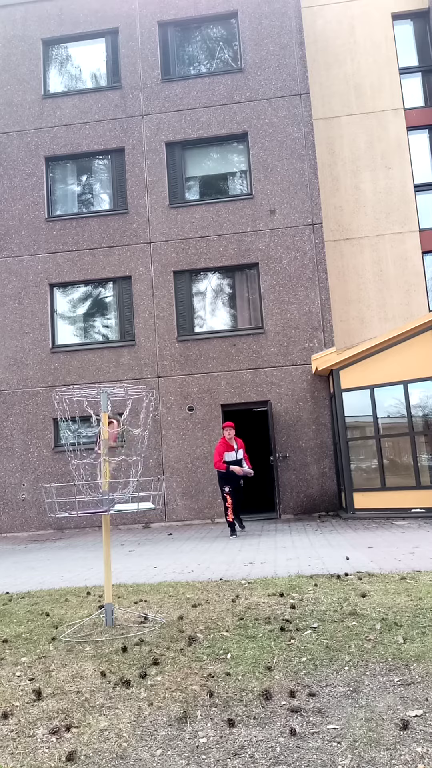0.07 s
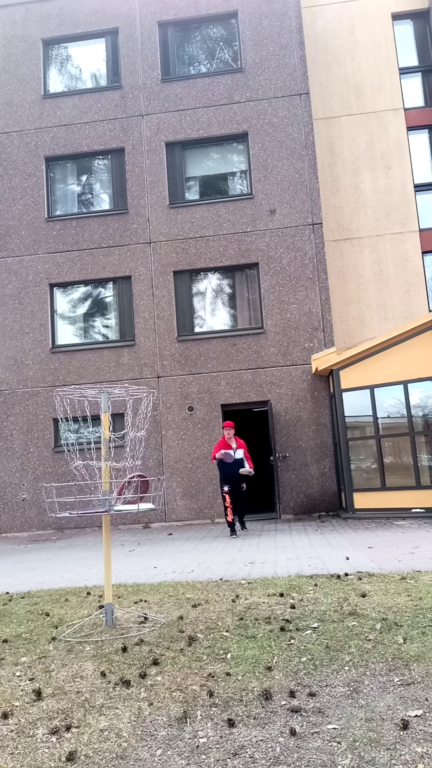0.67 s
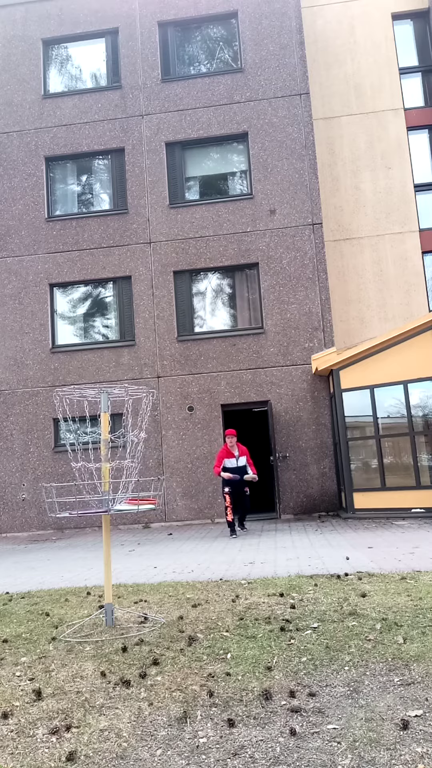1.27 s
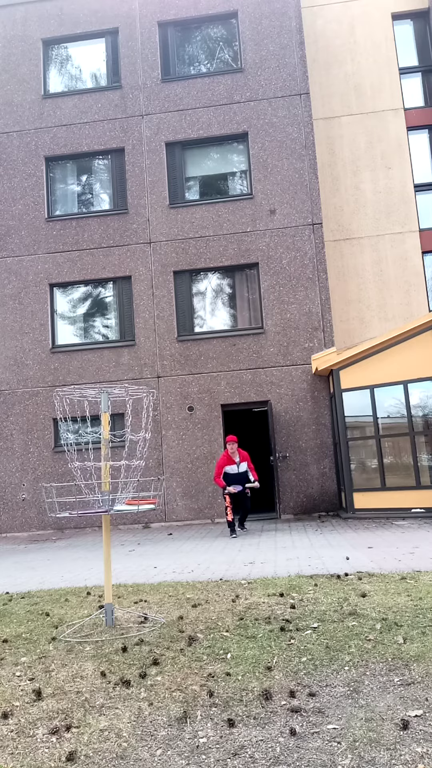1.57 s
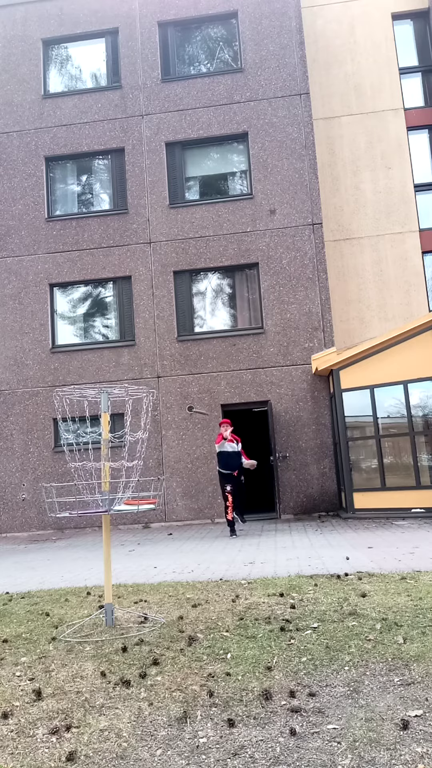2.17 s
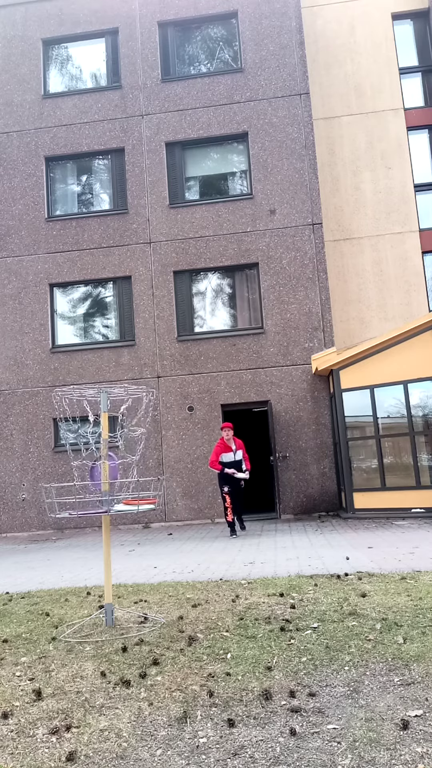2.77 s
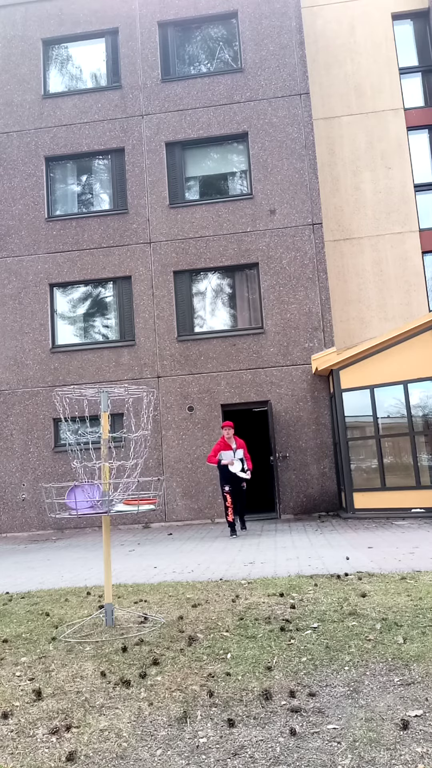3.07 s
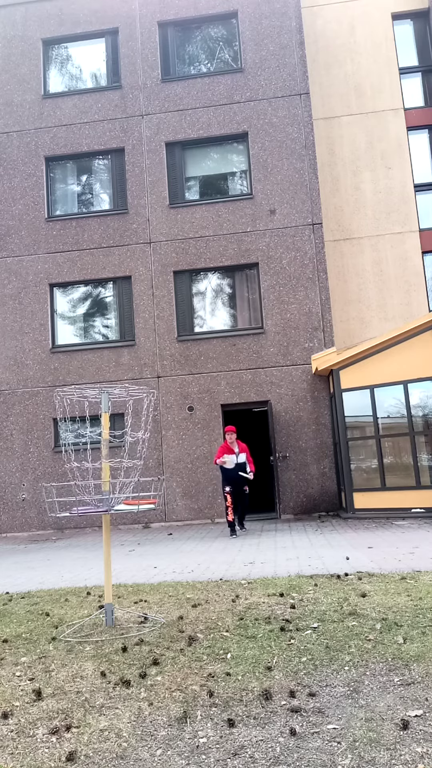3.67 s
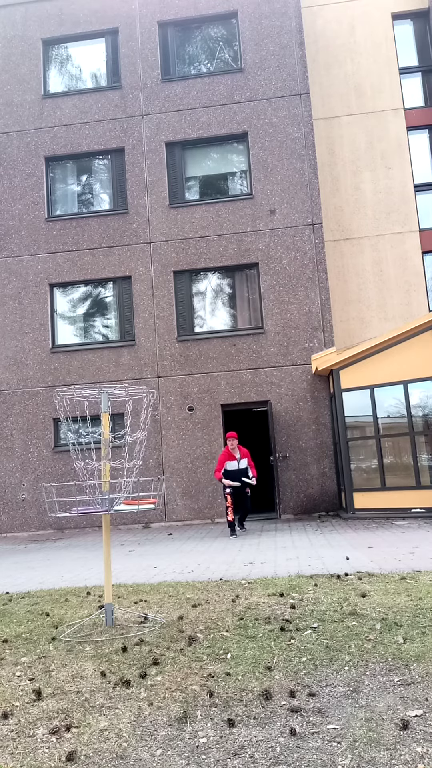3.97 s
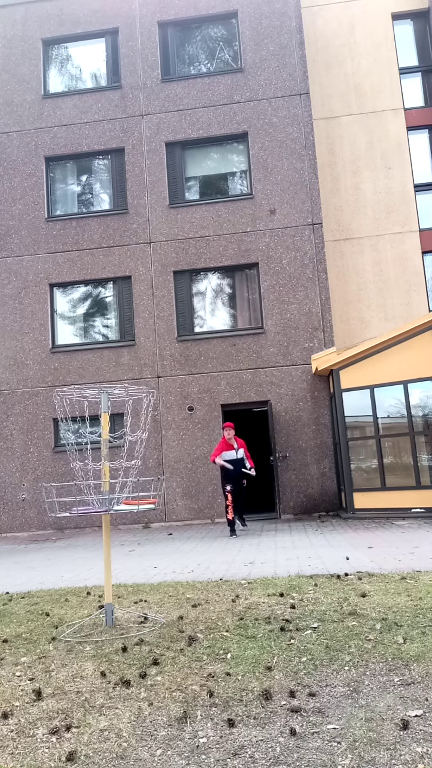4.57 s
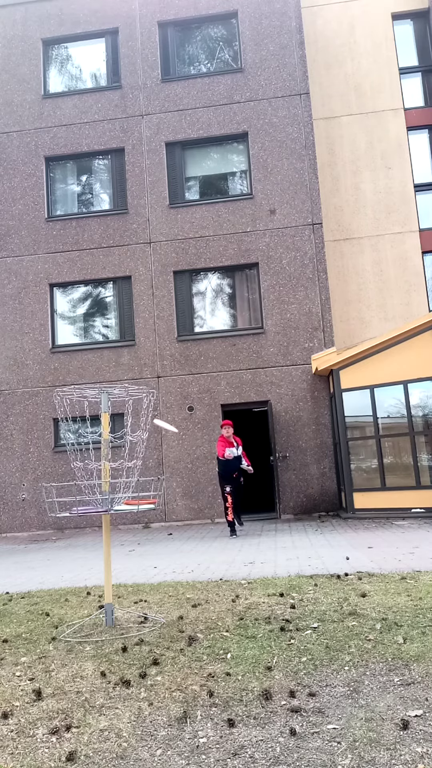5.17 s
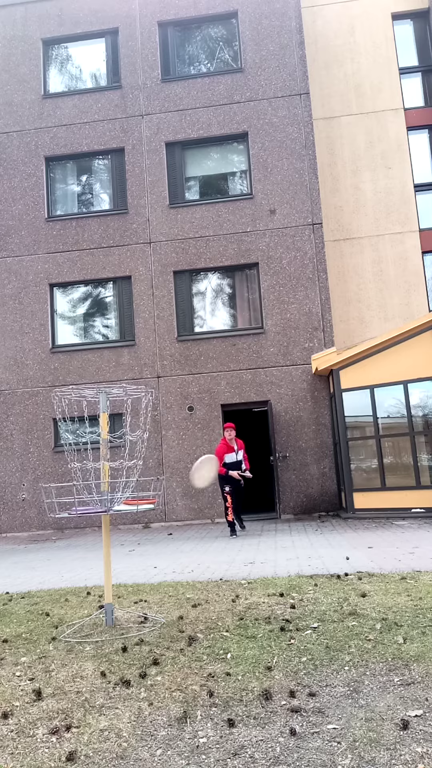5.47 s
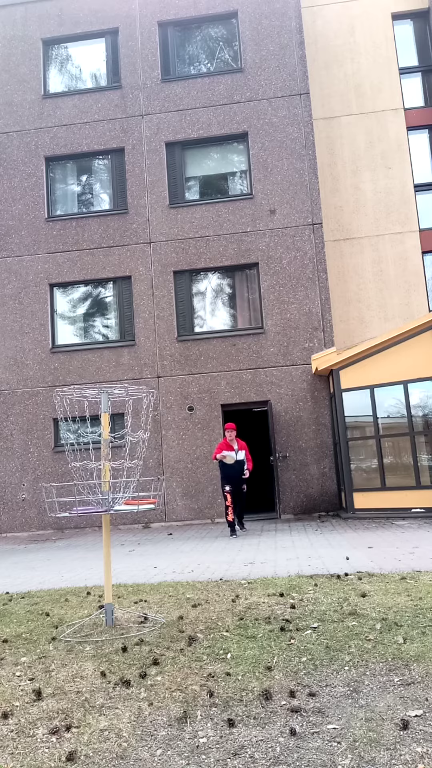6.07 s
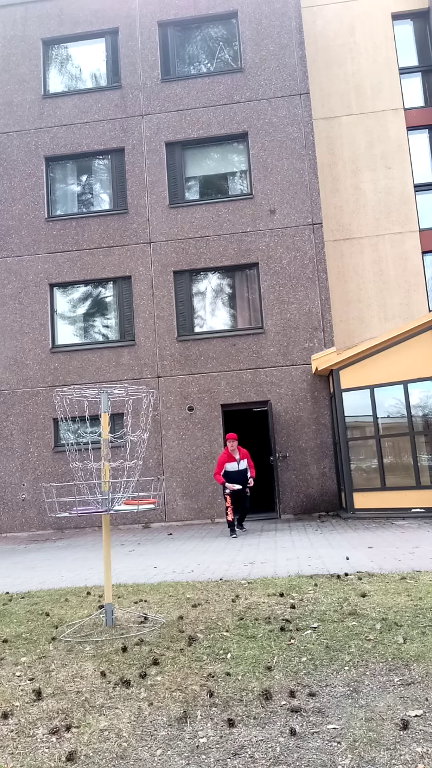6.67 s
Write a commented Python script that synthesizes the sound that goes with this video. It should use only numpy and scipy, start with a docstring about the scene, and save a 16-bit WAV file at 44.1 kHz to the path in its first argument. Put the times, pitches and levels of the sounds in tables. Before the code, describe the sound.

Right at the start, a plastic disc hits the steel chains of a nearby disc golf basket with a bright clash and a short ring of the pole. It knocks and rattles down into the wire cage until about 1.4 seconds, while the swinging chains jingle and fade. At about 2.7 seconds a second disc crashes in, ringing the pole more strongly, and clatters in the cage until about 3.4 seconds, the chains tinkling a little longer. A distant bird gives a few very faint notes around 4 to 4.7 seconds. At 5.3 seconds a third disc glances off the basket with a sharp double knock and a brief jingle, then thuds onto the grass at 5.8 seconds. A few faint, distant scuffs follow between 6 and 6.7 seconds. Light wind makes a low hush throughout, and the surrounding house fronts add a soft echo.

```python
"""Steel chains clash and jingle as three plastic discs hit a chain basket in a yard between flats. Each disc
knocks on the steel and sets the chains swinging, so their links tap one another and ring. Two discs ring the
pole and clatter down into the wire cage; the third glances off, rings the pole faintly and thuds on the lawn.
Behind them are light wind, a far bird and a few faint scuffs, and the house fronts give a soft echo."""
import sys
import numpy as np
from scipy import signal
from scipy.fft import rfft, irfft
from scipy.io import wavfile

SR = 44100
rng = np.random.default_rng(int(sys.argv[2]) if len(sys.argv) > 2 else 0)


def dump(signal):
    """Clip the signal to [-1, 1] and save it as 16-bit WAV at the path in sys.argv[1]."""
    limited = np.clip(np.atleast_2d(signal).T, -1, 1)
    pcm = np.round(limited * 32767).astype(np.int16)
    wavfile.write(sys.argv[1], SR, pcm)


N = 305172
T = np.arange(N) / SR

# Levels are relative: the functions add their own gain. ring_s is the time to fade by 60 dB.
# tone of the wind and the far town: frequency_hz, level_db
AIR_SPECTRUM = [(15, -46.5), (25, -4.5), (38, -14.5), (70, 0.5), (111, 2.5), (301, -3.5), (463, -13.5),
                (1190, -7.5), (1560, -24), (1840, -24), (2160, -38.5), (2410, -32), (3340, -36.5),
                (8140, -48.5), (16000, -63.5)]
# chain strands slap together (harder is brighter): start_s, level_db, hardness_db_per_octave
CHAIN_SLAPS = [(0.0014, -24, -3), (0.0429, -22.5, 2), (0.0707, -10.5, 7), (0.1136, -18, 10),
               (0.2397, -28.5, 1.5), (0.3564, -33.5, -0.5), (0.496, -43, -3), (0.6721, -42, -8),
               (0.839, -47, -3), (0.907, -47.5, 1), (1.263, -41.5, -6), (1.7991, -42, -1),
               (2.3166, -58.5, -8), (2.643, -28.5, -2), (2.6646, -21, 1), (2.7013, -12.5, 9),
               (2.7874, -27, 6), (2.8844, -28, 1), (2.9098, -28, -0.5), (3.0992, -32, -6),
               (3.1388, -36.5, -5), (3.2316, -38.5, -8), (3.3113, -39, -9.5), (3.5379, -36, -3),
               (3.6104, -42, -6), (3.6897, -50, 2), (5.3177, -24, -2), (5.3377, -25.5, -2),
               (5.3616, -27.5, -2), (5.4844, -49, 3)]
# tones of a chain link: pitch_hz, spread_between_links_hz, level_db, ring_s
LINK_TONES = [(1944, 200, 0.5, 0.12), (2565, 140, -0.5, 0.12), (3556, 390, -3, 0.088),
              (5755, 460, -2, 0.091), (6460, 150, 1.5, 0.048), (7160, 210, -12.5, .08),
              (9020, 480, -14.5, 0.035), (11030, 740, -27.5, 0.2), (14830, 304, -21, .09)]
# throws that swing the chains and rattle the disc:
# start_s, jingle_db, fade_db_per_s, swing_back_at_s, between_swings_s, rattle_db, rattle_length_s
DISC_THROWS = [(0.0, -45.5, 29, 0.63, 0.36, -27, 1.25), (2.645, -47, 31, 3.16, .47, -27, .8),
               (5.32, -55, 55, 5.67, .33, -26, .35)]
# main knocks of a disc on steel: start_s, disc_level_db, disc_pitch_hz, steel_level_db
MAIN_KNOCKS = [(0.013, -16, 1380, -24.5), (0.042, -11.5, 1120, -21), (0.051, -16.5, 976, -21.5),
               (0.071, -15, 1145, -16.5), (0.121, -15, 1173, -23), (0.215, -24, 907, -33),
               (0.255, -23, 1206, -36), (0.496, -32, 1300, -42), (0.573, -28.5, 870, -39),
               (0.585, -25, 1240, -39.5), (0.611, -27, 1106, -36.5), (0.84, -33, 1200, -45),
               (0.868, -19.5, 1226, -29.5), (1.075, -25, 1023, -38), (1.141, -35, 1085, -48),
               (1.246, -28.5, 1094, -46), (1.349, -32, 1008, -52), (2.643, -16.5, 1004, -26.5),
               (2.662, -13, 1246, -28), (2.685, -11.5, 930, -20.5), (2.7, -12, 1450, -15.5),
               (2.777, -16.5, 1540, -32), (2.784, -13.5, 890, -28), (2.819, -17, 1130, -38),
               (2.841, -16, 1213, -30.5), (3.05, -21, 1192, -30.5), (3.139, -17, 1313, -26.5),
               (3.311, -19, 1234, -39), (3.734, -33, 1204, -57), (5.318, -14, 1123, -28),
               (5.338, -7, 1231, -26.5), (5.418, -24.5, 998, -38.5), (5.465, -24, 1010, -42)]
# tones of a plastic disc: pitch_multiple, level_db, ring_s
DISC_TONES = [(.71, -8, .02), (.86, 1, 0.02), (1.019, 4.5, 0.023), (1.199, -5, .016), (1.5, -7.5, 0.017)]
# tones of the wire or rim that the disc hits: pitch_hz, level_db, ring_s
CLANK_TONES = [(1914, -5, 0.02), (2350, -2.5, .016), (2603, 2, 0.021), (3007, -8.5, 0.0027),
               (3780, -6.5, 0.01), (5800, -16, 0.008)]
# strength of the wire cage's tones, low to high: pitch_hz, level_db
CAGE_SPECTRUM = [(90, -17.5), (250, -10), (550, -13), (850, -5), (1250, 1.5), (1500, -8.5), (2500, -15),
                 (3200, -19)]
# heavy blows that shake the basket's frame: start_s, level_db
FRAME_SHAKES = [(0.072, -53), (0.257, -38.5), (2.688, -33.5), (2.843, -35.5), (5.321, -37), (5.338, -34.5)]
# tones of the frame: pitch_hz, level_db, ring_s
FRAME_TONES = [(83, -9.5, .3), (120.5, -7, 0.358), (156, -9.5, 0.065), (233, -3.5, 0.19), (303, -6.5, 0.14),
               (416, -6.5, 0.3), (495.4, -8, 0.17)]
# blows on the steel pole: start_s, level_db, hardness_db_per_octave
POLE_HITS = [(0.073, -29, 5), (0.114, -36, 5), (2.703, -22.5, 0), (5.338, -45, 0)]
# tones of the pole: pitch_hz
POLE_PITCHES = [1673, 1788, 1907, 2580, 4661, 4731, 4793, 5361, 5857, 6526, 9078, 9157, 9318, 9889]
# how each of those tones rings: level_db, ring_s
POLE_RINGS = [(-1, .6), (-2, .37), (-17, .7), (-19, .4), (-14, .36), (-18, .45), (-8.5, .39), (-16, .28),
              (-20, .28), (-14, .22), (-18, .21), (-23, .22), (-26, .2), (-28, .18)]
# notes of a far bird: start_s, length_s, first_pitch_hz, last_pitch_hz, level_db
BIRD_NOTES = [(3.94, .08, 3550, 3250, -65), (3.96, .1, 2620, 2490, -70), (4.13, .07, 3600, 3200, -70),
              (4.26, .41, 2590, 2940, -65)]
# tones of a disc hitting the lawn: pitch_hz, level_db, ring_s
THUD_TONES = [(116, -10.5, 0.15), (181, -3, 0.067), (254, -0.5, 0.036), (398, -5.5, 0.026),
              (646, -17, 0.054), (1190, -4.5, 0.0058)]
# faint scuffs across the yard: start_s, level_db
FAR_SCUFFS = [(6.021, -61.5), (6.1743, -54), (6.417, -56), (6.6444, -60.5), (6.6854, -59.5)]
# echoes from the house fronts: delay_s, level_db
WALL_ECHOES = [(0.046, -26.5), (0.078, -24.5), (0.126, -27.5)]


def from_db(db):
    """Turn decibels into a number to multiply a sound by."""
    return 10 ** (np.asarray(db) / 20)


def unit_energy(x):
    """Scale so that the squares add up to one."""
    return x / np.sqrt(np.sum(x ** 2) + 1e-20)


def level_at(spectrum, hz):
    """Read the level in dB between the points of a spectrum, with octaves evenly spaced."""
    points_hz, db = np.transpose(spectrum)
    return np.interp(np.log(np.maximum(hz, 1)), np.log(points_hz), db)


def band(x, low_hz, high_hz):
    """Gently turn down everything outside two frequencies."""
    edges_hz = [low_hz, min(high_hz, .45 * SR)]
    return signal.sosfilt(signal.butter(2, edges_hz, "band", fs=SR, output="sos"), x)


def drift(per_s):
    """Wander around zero, heading for a new random value per_s times a second."""
    targets = rng.standard_normal(int(N / SR * per_s) + 2)
    return np.interp(T * per_s, np.arange(len(targets)), targets)


def fade(ring_s, size):
    """Die away from one, losing 60 dB every ring_s; size is in samples."""
    return from_db(-60 * T[:size] / ring_s)


def struck(hz, db, ring_s, size):
    """A struck object: fading tones start together, each swinging up or down first by chance."""
    signs = rng.choice([-1, 1], len(hz))
    return sum(sign * from_db(level) * fade(ring, size) * np.sin(2 * np.pi * pitch * T[:size])
               for sign, pitch, level, ring in zip(signs, hz, db, ring_s))


def add(out, start_s, sound):
    """Mix a sound into out at the given time."""
    start = max(round(start_s * SR), 0)
    out[start:start + len(sound)] += sound[:len(out) - start]


def wind_and_town(level_db=-52, gust_db=2.5, waver_db=1.13, edges_hz=(349.3, 795, 1550, SR)):
    """A far hush: wind makes the low end lumpy, and each higher band wavers by itself."""
    hz = np.fft.rfftfreq(N, 1 / SR)
    noise = rfft(rng.standard_normal(N)) * from_db(level_at(AIR_SPECTRUM, hz))
    below_edge = [irfft(noise / (1 + (hz / edge) ** 8), N) for edge in edges_hz]
    wind = below_edge[0] * from_db(gust_db * drift(16))
    hush = sum(part * from_db(waver_db * drift(11)) for part in np.diff(below_edge, axis=0))
    return from_db(level_db) * np.sqrt(N) * unit_energy(wind + hush)


def high_hiss(level_db=-91):
    """A thin, steady, very high hiss."""
    return from_db(level_db) * np.sqrt(N) * unit_energy(band(rng.standard_normal(N), 14500, 15900))


def chain_motion(swing_db=5.5, stir_db=-19, settle_db_per_s=190):
    """How lively the chains are, in dB: a throw starts a dying swing, a slap briefly stirs the links."""
    power = np.zeros(N)
    for start_s, db, fade_db_per_s, back_s, period_s, *_ in DISC_THROWS:
        # the jingle swells each time the strands swing together
        swell_db = swing_db * np.cos(2 * np.pi * (start_s + T - back_s) / period_s)
        add(power, start_s, from_db(db + swell_db - fade_db_per_s * T) ** 2)
    stir = from_db(stir_db - settle_db_per_s * T[:SR])
    for start_s, db, _ in CHAIN_SLAPS:
        add(power, start_s, (from_db(db) * stir) ** 2)
    return 10 * np.log10(power + 1e-20)


def swing_touches(level_db=-3, brisk_per_s=700, brisk_db=-40.5, still_db=-92, uneven_db=2.2):
    """Swinging links meet at random, more often and harder when lively. Rows are like CHAIN_SLAPS."""
    motion_db = chain_motion()
    per_s = brisk_per_s * from_db(.24 * (motion_db - brisk_db))
    touching = (rng.random(N) < per_s / SR) & (motion_db > still_db)
    # the power of the swing is shared among its touches
    touch_db = motion_db + level_db - 10 * np.log10(per_s / brisk_per_s) + rng.normal(0, uneven_db, N)
    hardness = 2.5 + .14 * (motion_db - brisk_db)
    return np.c_[T, touch_db, hardness][touching]


def slap_touches(level_db=-11, fall_db=13, length_s=.013, brisk_db=-28.5, count=12):
    """A slap runs along a strand as a quick, fading burst of touches. Rows are like CHAIN_SLAPS."""
    rows = []
    for start_s, db, hardness in CHAIN_SLAPS:
        along = (np.arange(count) + rng.random(count)) / count
        touch_hardness = np.full(count, hardness + .1323 * (db - brisk_db))
        rows.append(np.c_[start_s + length_s * along ** 2, db + level_db - fall_db * along, touch_hardness])
    return np.vstack(rows)


def chains(level_db=-5, contact_s=.00015, most_lift_db=5.5, count=120, size=5500):
    """Every touch makes a dry tick and rings one link; the links are alike, but each has its own pitches."""
    hz, spread_hz, tone_db, ring_s = np.transpose(LINK_TONES)
    pitches = hz + spread_hz * rng.standard_normal((count, len(hz)))
    # a link swells while the contact lasts, then dies away
    swell = 1 - np.exp(-(T[:size] / contact_s) ** 2)
    links = np.sin(2 * np.pi * pitches[..., None] * T[:size]) * swell * fade(ring_s[:, None], size)
    rings, ticks = np.zeros(N), np.zeros(N)
    for start_s, db, hardness in np.vstack([slap_touches(), swing_touches()]):
        signs = np.sign(rng.standard_normal(len(hz)))
        # a soft touch favours the low tones, a hard one the high tones
        tilt_db = np.minimum(hardness * np.log2(hz / 6000), most_lift_db)
        shares = from_db(tone_db + tilt_db) * signs
        add(rings, start_s, from_db(db + level_db) * shares @ links[rng.integers(count)])
        add(ticks, start_s, from_db(db) * signs[:1])
    return rings + band(band(ticks, 700, 6500), 700, 6500)


def disc_rattles(per_s=26, fall_db=15, uneven_db=3, pitch_hz=1130, steel_db=-14, most_count=40):
    """A tumbling disc makes small, uneven knocks that grow weaker. Rows are like MAIN_KNOCKS."""
    rows = []
    for start_s, *_, rattle_db, length_s in DISC_THROWS:
        age_s = np.cumsum(rng.uniform(.3, 1.7, most_count)) / per_s
        db = rattle_db - fall_db * age_s / length_s + uneven_db * rng.uniform(-1, 1, most_count)
        hz = pitch_hz * np.exp(rng.normal(0, .12, most_count))
        rows.append(np.c_[start_s + age_s, db, hz, db + steel_db][age_s < length_s])
    return np.vstack(rows)


def disc_knocks(knocks, level_db=-2, clank_db=6, hard_db=-20, bounce_db=-5.5, bounce_s=.003002, size=4096):
    """A knock is the dull note of the disc, which bounces once, and the brief clank of the steel it hits."""
    discs, clanks = np.zeros(N), np.zeros(N)
    multiple, tone_db, ring_s = np.transpose(DISC_TONES)
    steel_hz, steel_tone_db, steel_ring_s = np.transpose(CLANK_TONES)
    for start_s, disc_db, pitch_hz, steel_db in knocks:
        hz = pitch_hz * multiple * (1 + .04 * rng.standard_normal(len(multiple)))
        note = struck(hz, tone_db + rng.normal(0, .84, len(hz)), ring_s, size)
        add(note, bounce_s * rng.uniform(.5, 2.002), struck(hz, tone_db + bounce_db, ring_s, size))
        add(discs, start_s, from_db(disc_db + level_db) * note / np.abs(note).max())
        clank_hz = steel_hz * (1 + .04 * rng.standard_normal(len(steel_hz)))
        clank = struck(clank_hz, steel_tone_db, steel_ring_s, size)
        crack_db = -10 + .3 * (steel_db - hard_db)   # harder knocks crack more
        clank += from_db(crack_db) * rng.standard_normal(size) * fade(.0071, size)
        add(clanks, start_s, from_db(steel_db + clank_db) * clank / np.abs(clank).max())
    return band(discs, 450, 2600) + band(band(clanks, 1000, 7500), 700, 7000)


def cage(knocks, level_db=-13, ring_s=.39, count=220, size=18000):
    """The welded wires have many close tones; each knock rings a new mix of them."""
    hz = np.linspace(CAGE_SPECTRUM[0][0], CAGE_SPECTRUM[-1][0], count) + rng.uniform(-6.5, 7, count)
    strengths = from_db(level_at(CAGE_SPECTRUM, hz))
    tones = strengths[:, None] * np.sin(2 * np.pi * hz[:, None] * T[:size]) * fade(ring_s, size)
    out = np.zeros(N)
    for start_s, db, *_ in knocks:
        shares = unit_energy(rng.standard_normal(count))
        add(out, start_s, from_db(db + level_db) * shares @ tones)
    return band(out, 75, 5100)


def frame(size=22000):
    """After a heavy blow, pole and cage sway together with a low, short boom."""
    out = np.zeros(N)
    for start_s, db in FRAME_SHAKES:
        add(out, start_s, from_db(db) * struck(*np.transpose(FRAME_TONES), size))
    return band(out, 78.8, 900)


def pole(twin_db=-10, twin_spread_hz=30, size=SR):
    """The steel tube rings; it is not quite round, so each tone has a weak twin that makes it wobble."""
    out, hz = np.zeros(N), np.array(POLE_PITCHES)
    tone_db, ring_s = np.transpose(POLE_RINGS)
    for start_s, hit_db, hardness in POLE_HITS:
        db = tone_db + hit_db + hardness * np.log2(hz / 4000)
        twin_hz = hz + twin_spread_hz * rng.standard_normal(len(hz))
        add(out, start_s, struck(hz, db, ring_s, size) + struck(twin_hz, db + twin_db, ring_s, size))
    return band(out, 900, 13000)


def bird(waver=.02, edge_db=-10, blur_s=.196, size=16000):
    """Short falling notes and a long rising whistle, raspy, loudest midway and blurred by distance."""
    out = np.zeros(N)
    for start_s, length_s, first_hz, last_hz, db in BIRD_NOTES:
        hz = np.interp(T, [start_s, start_s + length_s], [first_hz, last_hz]) * (1 + waver * drift(300))
        off_middle = np.minimum(np.abs(2 * (T - start_s) / length_s - 1), 1)
        swell = from_db(db + edge_db * off_middle ** 2) * (off_middle < 1)
        rasp = 1 + drift(240)
        out += swell * rasp * np.sin(2 * np.pi * np.cumsum(hz) / SR)
    blur = unit_energy(rng.standard_normal(size) * fade(blur_s, size))
    return signal.fftconvolve(out, blur)[:N]


def lawn_landing(start_s=5.789, level_db=-21.5, crunch_db=-1.5, crunch_s=.011, size=12000):
    """The disc drums on the lawn, with a short crunch of dry grass."""
    out = np.zeros(N)
    crunch = from_db(crunch_db) * band(rng.standard_normal(size) * fade(crunch_s, size), 2440, 3230)
    thud = band(struck(*np.transpose(THUD_TONES), size), 100, 2000)
    add(out, start_s, from_db(level_db) * (thud + crunch))
    return out


def scuffs(level_db=-1, rise_s=.0013, fade_s=.098, size=8000):
    """Small gritty scrapes far off, each a quick puff of noise."""
    out = np.zeros(N)
    shape = (1 - np.exp(-T[:size] / rise_s)) * fade(fade_s, size)
    for start_s, db in FAR_SCUFFS:
        add(out, start_s, from_db(db + level_db) * rng.standard_normal(size) * shape)
    return band(out, 1000, 4200)


def yard_echo(sound, tail_db=-19.5, low_ring_s=.83, high_ring_s=.74, high_db=-5, size=SR):
    """The walls send back a few dull echoes and a thin tail whose high part dies first."""
    low, high = rng.standard_normal((2, size))
    tail = band(low, 120, 2200) * fade(low_ring_s, size)
    tail += from_db(high_db) * band(high, 3700, 6500) * fade(high_ring_s, size)
    walls = np.zeros(size)
    for delay_s, db in WALL_ECHOES:
        add(walls, delay_s, from_db([db]))
    echoes = band(walls, 120, 7100) + from_db(tail_db) * unit_energy(tail)
    return signal.fftconvolve(sound, echoes)[:N]


def scene():
    """Basket, lawn, bird and scuffs echo in the yard, over the wind and hiss."""
    knocks = np.vstack([MAIN_KNOCKS, disc_rattles()])
    basket = disc_knocks(knocks) + cage(knocks) + chains() + pole() + frame()
    direct = basket + lawn_landing() + bird() + scuffs()
    return (direct + yard_echo(direct) + wind_and_town() + high_hiss())[None]


def record(dry, ceiling=.7, low_hz=20, high_hz=15750):
    """Round off the loudest peaks, then cut the deepest bass and the highest treble."""
    rounded = ceiling * np.tanh(dry / ceiling)
    bass_cut = signal.sosfilt(signal.butter(1, low_hz, "high", fs=SR, output="sos"), rounded)
    return signal.sosfilt(signal.ellip(10, .2, 70, high_hz, fs=SR, output="sos"), bass_cut)


dry = scene()
out = record(dry)
dump(out)
```